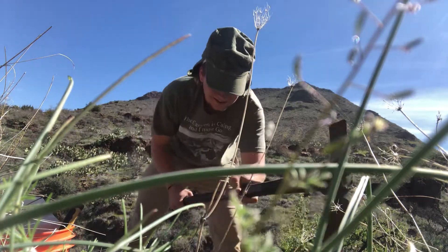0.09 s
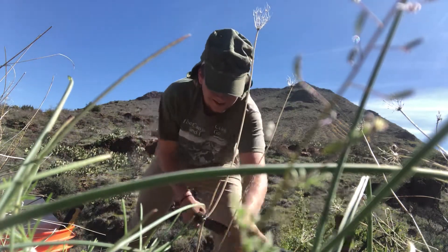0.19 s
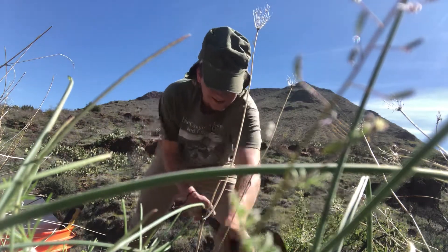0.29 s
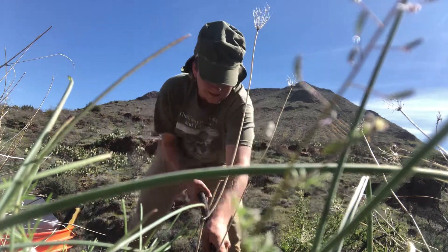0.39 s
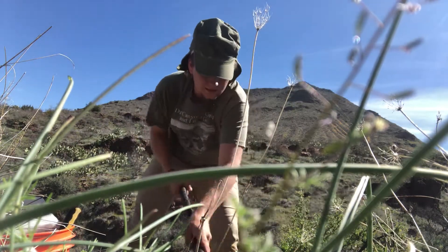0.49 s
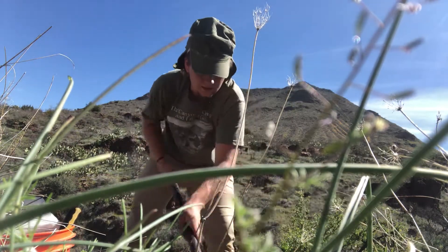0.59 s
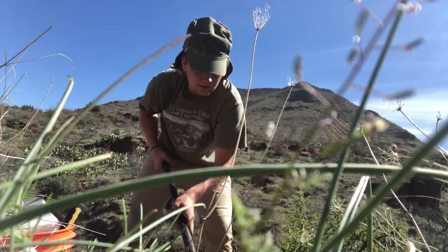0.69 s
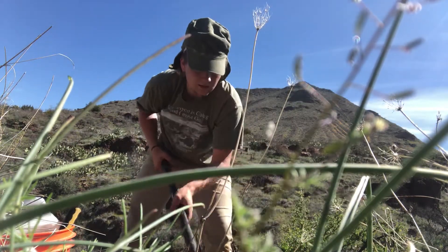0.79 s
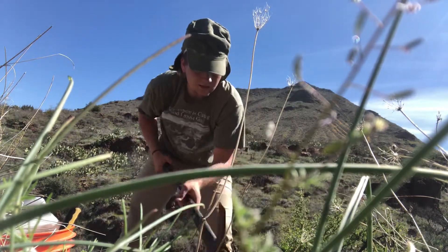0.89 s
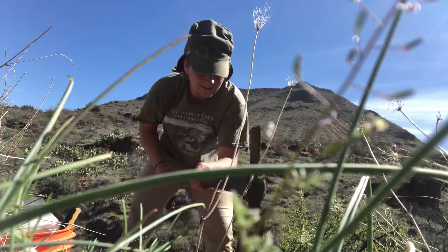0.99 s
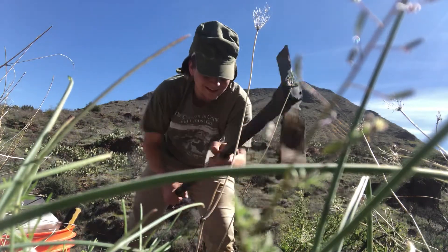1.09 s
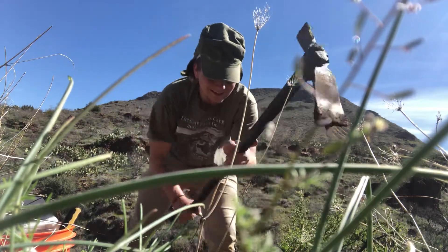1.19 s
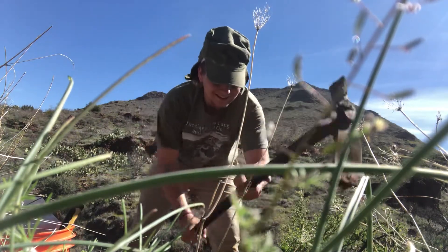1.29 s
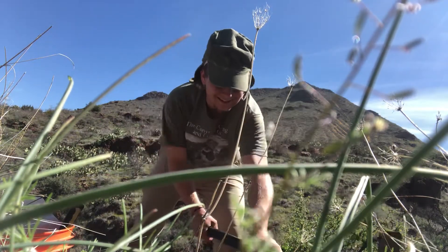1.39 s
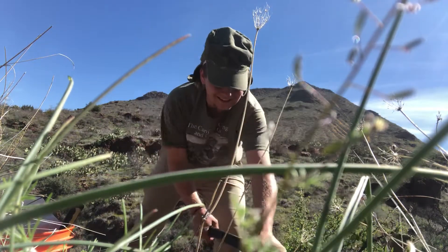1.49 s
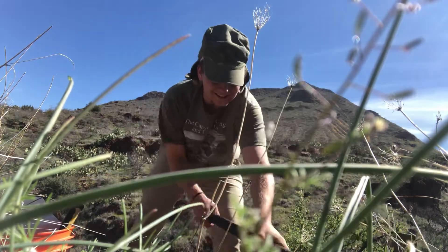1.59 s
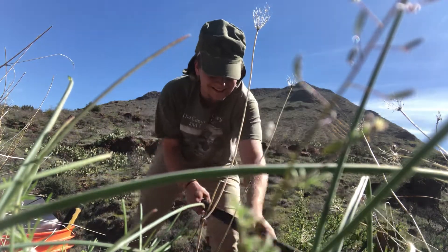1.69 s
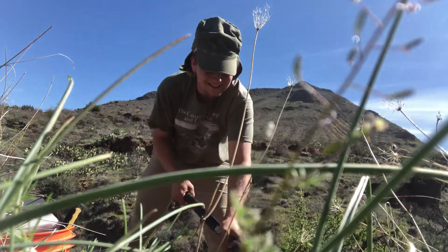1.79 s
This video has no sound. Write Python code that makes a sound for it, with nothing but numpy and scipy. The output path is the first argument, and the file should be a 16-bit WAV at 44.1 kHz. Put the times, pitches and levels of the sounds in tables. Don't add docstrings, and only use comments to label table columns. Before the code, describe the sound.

A steel pick strikes stony ground at about 0.2 s, a bright crack with short metallic ring and deep earthy thud. The blade grinds and squeaks through knocking stones until 0.5 s, then pebbles and dirt settle to 0.9 s. After a near-quiet gap, a second, duller blow lands at 1.4 s, a faint distant bird trills near 1.5 s, and the blade scrapes out from 1.6 s. Close, dry, light breeze.

```python
import sys
import numpy as np
from scipy import signal
from scipy.fft import rfft, irfft, next_fast_len
from scipy.io import wavfile
from scipy.ndimage import map_coordinates

SR = 44100
rng = np.random.default_rng(int(sys.argv[2]) if len(sys.argv) > 2 else 0)


def ratio(d):
    e = np.asarray(d, float) / 20
    return 10 ** e


def transcribe(u):
    v = np.clip(np.atleast_2d(u).T, -1, 1)
    q = np.round(v * 32767).astype(np.int16)
    wavfile.write(sys.argv[1], SR, q)


N = 79380


def along(points, hz):
    f, v = np.transpose(points)
    return np.interp(np.log(hz + 1), np.log(f + 1), v)


def unit(x):
    return x / np.sqrt(np.mean(x ** 2) + 1e-20)


def filtered(x, response):
    m = next_fast_len(len(x) + 8192)
    return irfft(rfft(x, m) * response(np.fft.rfftfreq(m, 1 / SR)), m)[:len(x)]


def causal(x, spectrum):
    gain = ratio(along(spectrum, np.fft.rfftfreq(4096, 1 / SR)))
    cepstrum = irfft(np.log(gain + 1e-6))
    cepstrum[1:2048] *= 2
    cepstrum[2049:] = 0
    impulse = irfft(np.exp(rfft(cepstrum)))[:2048]
    return signal.fftconvolve(x, impulse)[:len(x)]


def add(track, s, x):
    part = track[max(round(s * SR), 0):][:len(x)]
    part += x[:len(part)]


def ringing(modes, t, grip=1):
    out = 0
    for k, (hz, db, t60) in enumerate(modes):
        out = out + (-1) ** k * ratio(db - 60 * (t / t60) ** grip) * np.sin(2 * np.pi * hz * t)
    return out


# (frequency [Hz], level [dB per Hz])
AIR_COLOUR = [(18, -44.5), (30, 8.5), (167, 6.5), (201, -8.5), (235, 4.5), (1890, -14), (4900, -12.5),
              (15200, -20), (16500, -42.5)]


def air():
    drift = ratio(0.5 * map_coordinates(rng.standard_normal(30), [np.arange(N) / SR * 8]))
    noise = filtered(rng.standard_normal(N), lambda f: ratio(along(AIR_COLOUR, f)))
    return ratio(-67.5) * drift * unit(noise)


# (offset [s], length [s], pitch [Hz], level [dB], glide [Hz])
TRILL_NOTES = [
    (0, .007, 4800, 0, -150),
    (.013, .011, 4100, 1, -200),
]


def bird(count=12):
    out = np.zeros(N)
    start_s, period_s, trill_db = 1.470, .0293, -64.5
    for k in range(count):
        for offset, length, hz, db, glide_hz in TRILL_NOTES:
            t = np.arange(round(length * SR)) / SR
            swell = np.sin(np.pi * t / length)
            tone = swell * np.sin(2 * np.pi * t * (hz + glide_hz * (t / length - 1) / 2))
            level = ratio(trill_db + db + rng.normal(0, 2.9))
            add(out, start_s + k * period_s + offset, level * tone)
    return out


# (time [s], level [dB])
TRICKLE_LEVEL = [(0, -63), (.2, -59), (.25, -66), (.28, -50), (.5, -57), (.74, -63), (.95, -70),
                 (1.05, -75.5), (1.3, -69.5), (1.45, -58), (1.56, -73.5), (1.62, -61.5), (1.8, -58.5)]
# (frequency [Hz], level [dB per Hz])
DIRT_COLOUR = [(59, -27.5), (100, 8.5), (177, 4), (524, 3), (1170, -7), (1950, -13.5), (4770, -16),
               (16000, -33)]
# (time [s], half length [s], level [dB], centre [Hz], width [octaves])
DUST_PUFFS = [
    (0.008, 0.023, -62.5, 6870, 2.83),
    (0.109, 0.022, -64.5, 3440, 0.61),
    (1.119, 0.0446, -71, 5130, 0.328),
    (1.302, 0.0223, -64.5, 6432, 0.305),
    (1.401, 0.045, -54, 6990, 2.52),
    (1.68, 0.099, -59.5, 3150, 0.805),
]


def dirt():
    t = np.arange(N) / SR
    level = ratio(np.interp(t, *np.transpose(TRICKLE_LEVEL)))
    grains = rng.standard_normal(N) * ratio(3.0 * rng.exponential(size=N)) * (rng.random(N) < .3)
    clumps = ratio(2 * map_coordinates(rng.standard_normal(200), [t * 60]))
    out = ratio(2.5) * level * clumps * unit(causal(grains, DIRT_COLOUR))
    for s, half, db, hz, width in DUST_PUFFS:
        band = lambda f: np.exp(-(np.log2((f + 1) / hz) / width) ** 2 / 2)
        swell = np.exp(-((t - s) / half) ** 2)
        out += ratio(db) * swell * unit(filtered(rng.standard_normal(N), band))
    return out


# (time [s], length [s], pitch [Hz], level [dB])
BLADE_SONGS = [(0.282, 0.011, 5300, -56.5), (.308, 0.022, 5274, -35), (0.317, 0.0069, 7730, -46),
               (.345, .009, 7287, -46), (0.344, 0.013, 4377, -35), (0.393, 0.018, 5735, -37.5),
               (.467, 0.008, 5655, -48.5), (0.534, 0.0181, 4203, -49.5), (.585, 0.001226, 4777, -39),
               (1.638, 0.0064, 4500, -47.5), (1.671, 0.0096, 4503, -48), (1.686, 0.0074, 4270, -44),
               (1.72, 0.005, 10300, -49.5), (1.772, 0.0102, 4170, -59.5)]


def sings():
    out, t = np.zeros(N), np.arange(SR // 16) / SR
    ring_t60_s = .014
    for s, length, hz, db in BLADE_SONGS:
        rub = (1 + rng.standard_normal(len(t))) * rng.standard_normal(len(t)) * (t < .7 * length)
        mode = ratio(-60 * t / ring_t60_s) * np.sin(2 * np.pi * hz * t)
        tone = np.convolve(rub, mode)[:len(t)]
        add(out, s, ratio(db + 4.5) * tone / np.abs(tone).max())
    return out


# (time [s], length [s], knock level [dB], grit level [dB], knock pitch [Hz])
KNOCKED = [(.053, 0.00417, -65, -77.5, 1230), (.094, 0.0357, -56.5, -73.5, 542),
           (.1135, 0.00113, -43, -90, 882), (.1145, 0.0023, -37.5, -85.5, 588),
           (.122, 0.0169, -56.5, -97, 473), (.265, 0.00484, -49, -67.5, 640),
           (.271, 0.0021, -42, -63.5, 714), (.274, 0.0153, -57.5, -65.5, 700),
           (.295, 0.0075, -61.5, -63, 1510), (.317, 0.00984, -57.5, -48.5, 1510),
           (.3455, .002, -44, -49.5, 1510), (.3935, 0.001975, -51, -48, 1800), (.35, 0.0039, -43, -67, 424),
           (.288, 0.03116, -42.5, -50, 621), (.308, 0.02858, -44.5, -56, 575.4),
           (.326, 0.00316, -34, -71.5, 466.6), (.344, 0.011, -47.5, -45, 1140),
           (.376, 0.018, -55.5, -62, 1520), (.384, 0.0026, -53, -57.5, 1780), (.392, 0.015, -49, -45, 1258),
           (.438, .008, -57.5, -59.5, 896), (.448, 0.0065, -41.5, -53, 900),
           (.4605, 0.0024, -42.5, -54.5, 1330), (.4645, .002, -43.5, -56, 1198),
           (.469, 0.0024, -44, -51, 1025), (.472, 0.00442, -44.5, -60.5, 702), (.49, 0.01, -68.5, -71, 900),
           (.512, 0.0023, -65.5, -81, 900)]
# (time [s], length [s], knock level [dB], grit level [dB], knock pitch [Hz])
SETTLED = [(.531, 0.0174, -68.5, -67.5, 600), (.56, 0.00381, -64.5, -65.5, 1100),
           (.567, 0.0151, -62, -65, 900), (.581, .003, -52.5, -77, 437), (.5865, 0.003034, -51, -50.5, 964),
           (.592, 0.00766, -61.5, -63.5, 804), (.626, 0.00395, -74.5, -56, 640),
           (.6295, .0019, -44, -64, 650), (.673, .002, -80, -69, 900), (.692, .004, -70, -63, 1250),
           (.634, 0.0215, -58.5, -64, 607), (.709, 0.00167, -49.5, -74, 2053),
           (.7095, 0.00131, -53, -85, 1546), (.711, 0.006, -55.5, -89, 1847),
           (.71, 0.0021, -51.5, -92, 727), (.714, 0.0024, -48.5, -85, 574), (.738, 0.0034, -61.5, -91, 476),
           (.865, 0.0023, -60, -96, 202.8), (.905, 0.0298, -75, -75, 928.8)]
# (time [s], length [s], knock level [dB], grit level [dB], knock pitch [Hz])
DRAGGED_OUT = [(1.598, 0.01287, -58, -62.5, 900), (1.612, 0.0237, -66.5, -69.5, 1200),
               (1.632, 0.01173, -58, -58.5, 1330), (1.644, 0.0118, -64.5, -70, 1190),
               (1.655, 0.01326, -61, -63.5, 1300), (1.669, 0.01226, -53.5, -60, 953),
               (1.684, 0.0096, -57, -57.5, 1117), (1.694, 0.01726, -63.5, -64, 1170),
               (1.712, .009, -62, -65, 1240), (1.72, 0.00752, -47, -51, 1023), (1.729, .014, -74, -63, 900),
               (1.745, 0.0141, -63, -61.5, 900), (1.787, 0.0143, -63, -64, 1194),
               (1.797, 0.00292, -68, -61, 1200), (1.305, 0.0109, -72, -77, 900)]
# (frequency [Hz], level [dB per Hz])
GRIT_COLOUR = [(500, -1), (1800, -3), (2600, -5), (5000, -2), (8000, -7.5), (16000, -6)]
# (frequency [Hz], width [Hz], level [dB])
BURIED_BLADE = [(1747, 250, 3), (2917, 120, 5), (3340, 290, 8.5), (4430, 240, 8), (5330, 77, 11),
                (5720, 110, 4.5), (7270, 270, 7), (7730, 220, 8.5), (9730, 260, 8.5)]
# (frequency [Hz], width [Hz], level [dB])
PULLED_BLADE = [(1590, 230, 4.2), (3360, 270, 3.2), (4420, 240, 10.6), (6000, 390, 4.7), (7360, 370, 3.6),
                (9600, 320, 12.1), (10300, 227, 6.2), (12600, 300, 4), (14200, 245, 12)]


def stones(rows, blade, count=300):
    def rattle(f):
        modes = [ratio(db) * 1j * f * w / (hz * hz - f * f + 1j * f * w) for hz, w, db in blade]
        return 1 + sum(modes)

    out, t, short = np.zeros(N), np.arange(SR // 12) / SR, np.arange(128)
    pitch_scatter, life_cycles, pitch_sag, knock_size_db = 0.443, 1.6, 0.054, 5.5
    grain_low_hz, grain_octaves, grain_cycles, grain_size_db = 900, 4.2, 1.2, 2.5
    for s, length, knock_db, grit_db, hz in rows:
        u, g, e = rng.random((4, count)), rng.standard_normal(count), rng.exponential(size=count)

        knocks = 1 + int(length / .002)
        several = knocks > 2
        start = length * (np.arange(knocks) + 0.74 * u[0, :knocks])[:, None] / knocks * several
        age = np.clip(t - start, 0, 1)
        cycles = age * hz * np.exp(pitch_scatter * g[:knocks, None] * several)
        level = ratio(knock_size_db * (u[1, :knocks, None] - .5) - 20 * cycles / life_cycles)
        onset = 1 - np.exp(-1.5 * cycles)
        tone = np.sin(2 * np.pi * cycles * (1 + pitch_sag * np.exp(-cycles / 2)))
        knock = np.sum(level * onset * tone, axis=0)

        when = (length * SR * 1.4 * u[2] ** 1.2).astype(int)
        size = ratio(grain_size_db * e) * np.sign(g) * (1 - u[2] ** 2)
        grain_hz = np.minimum(grain_low_hz * 2 ** (grain_octaves * u[3, :, None]), 16000)
        turns = short / SR * grain_hz
        shape = ratio(-20 * turns / grain_cycles) * (1 - np.exp(-turns)) * (1 - short / 128)
        grains = size[:, None] * np.sin(2 * np.pi * turns) * shape
        chips = np.bincount((when[:, None] + short).ravel(), grains.ravel(), len(t))[:len(t)]
        grit = unit(filtered(causal(chips, GRIT_COLOUR), rattle))

        energy = np.sqrt((length * SR + 90) / len(t))
        contact = ratio(knock_db) * unit(knock) + ratio(grit_db) * grit
        add(out, s, ratio(8.5) * energy * contact)
    return out


# (time [s], level [dB], strongest frequency [Hz])
GROUND_WAVES = [
    (0.112, -52.5, 65),
    (0.218, -22, 59),
    (.338, -36, 67),
    (.385, -37.5, 80.1),
    (0.466, -43.5, 56.7),
    (1.396, -23, 56.9),
    (1.719, -45.5, 66.7),
    (0.582, -48, 80),
]


def ground():
    out, push = np.zeros(N), np.zeros(SR // 5)
    push[0] = 1
    width_oct, skirt_db, late_cycles = 0.321, -9.5, 3.1
    for s, db, hz in GROUND_WAVES:
        def soil(f):
            octaves = np.log2((f + 1) / hz)
            hump = np.exp(-(octaves / width_oct) ** 2 / 2)
            skirt = ratio(skirt_db) * np.exp(-((octaves - 1.5) / 0.33) ** 2 / 2)
            return (hump + skirt) * np.exp(-2j * np.pi * late_cycles * np.log((f + 25) / 25))

        wave = filtered(push, soil)
        add(out, s, ratio(db) * wave / np.abs(wave).max())
    return out


# (time [s], crack level [dB], crack t60 [s], crush t60 [s], thud level [dB], thud lag [s])
PICK_BLOWS = [
    (0.2164, -8, 0.011, 0.014, -4, 0.0016),
    (1.3968, -8.5, 0.01955, 0.0285, -8, 0.0007826),
]
# (frequency [Hz], level [dB per Hz])
CRACK_COLOURS = [
    [(900, -32), (2200, -3.5), (2800, -15), (3500, 0.5), (5800, 0.5), (6900, -5.5), (7600, -2),
     (16000, -33.5)],
    [(880, -14.5), (1500, 4), (2940, -10), (4640, 1.5), (8320, -22.5), (11900, -15), (16000, -26)],
]
# (frequency [Hz], level [dB], t60 [s])
SOIL_MODES = [
    [(147.2, -9.5, 0.0528), (250, 0.5, 0.0177), (351, 5, 0.022), (612, -2, 0.0185), (843.6, -2.5, 0.0025),
     (1159, -5.5, 0.0147)],
    [(169, -6, 0.0314), (268, -1.5, 0.0163), (615.2, 3.5, 0.0208), (900, -0.5, 0.0147), (1248.8, 2, 0.0141),
     (1547, -7.5, 0.0225)],
]
# (frequency [Hz], level [dB], t60 [s])
BLADE_MODES = [
    [(1650, -21, .018), (1930, -21, .014), (2350, -22, .014), (3490, -11, .012), (4420, -14, .018),
     (5200, -22, .015), (6110, -17, .016), (6450, -20, .014), (7530, -12, .013), (7950, -20, .014)],
    [(1330, -20, .02), (1900, -22, .015), (2450, -24, .02), (4400, -11, .008), (4750, -13, .008),
     (6500, -24, .015), (7500, -24, .01), (9700, -26, .015)],
]


def blows():
    out, t = np.zeros(N), np.arange(SR // 10) / SR
    lead_s, lead_db = 0.0012993, -8
    splinter_db, splinter_t60_s = -16, 0.02
    crush_share, thud_cycles = .1, 0.3564

    def packed(f):
        lateness = np.exp(-2j * np.pi * thud_cycles * np.log((f + 60) / 60))
        return lateness / (1 + (f / 2000) ** 4)

    for blow, colour, soil_modes, steel in zip(PICK_BLOWS, CRACK_COLOURS, SOIL_MODES, BLADE_MODES):
        s, db, crack_t60, crush_t60, thud_db, lag = blow
        white = rng.standard_normal((2, len(t)))
        age = np.clip(t - lead_s, 0, 1)

        fall = ratio(-60 * age / crack_t60) + ratio(splinter_db - 60 * age / splinter_t60_s)
        scrape = ratio(lead_db) * t / lead_s
        crack = unit(causal(white[0], colour)) * np.where(age > 0, fall, scrape)
        clang = ringing(steel, age) * (1 - np.exp(-age / 0.00019))

        late = np.clip(age - lag, 0, 1)
        burst = crush_share * white[1] * (late > 0) * ratio(-60 * late / crush_t60)
        burst[round((lag + lead_s) * SR)] += 1
        thud = np.convolve(burst, ringing(soil_modes, t, grip=1.6))[:len(t)]
        soil = filtered(thud, packed)
        thump = ratio(thud_db) * soil / np.abs(soil).max()
        add(out, s - lead_s, ratio(db - 5.5) * crack + clang + thump)
    return out


def scene():
    struck = blows() + ground()
    contacts = stones(KNOCKED, BURIED_BLADE) + stones(SETTLED, BURIED_BLADE) + stones(DRAGGED_OUT, PULLED_BLADE)
    rubbed = sings()
    background = dirt() + bird() + air()
    return (struck + contacts + rubbed + background)[None]


def roll_off(x):
    return signal.sosfilt(signal.butter(12, 16810, fs=SR, output="sos"), x)


def record(dry):
    low_hz, top_hz = 45, 16000
    band = lambda f: (1j * f / (1j * f + low_hz)) ** 2 / (1 + (f / top_hz) ** 120)
    heard = filtered(dry[0], band)[None]
    return roll_off(heard)


dry = scene()
out = record(dry)
transcribe(out)
```